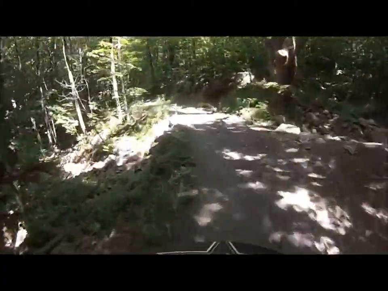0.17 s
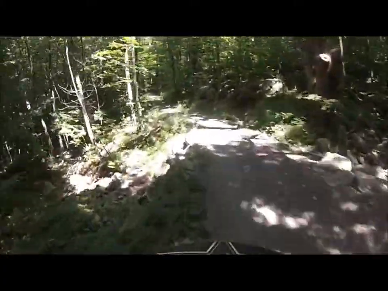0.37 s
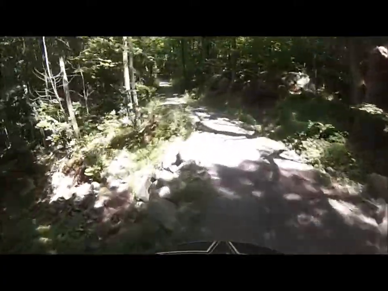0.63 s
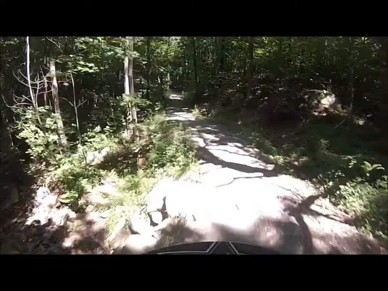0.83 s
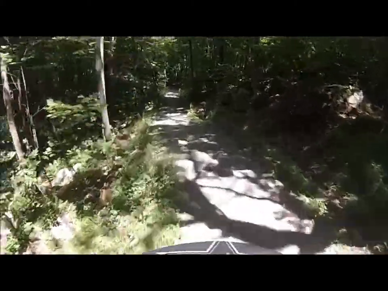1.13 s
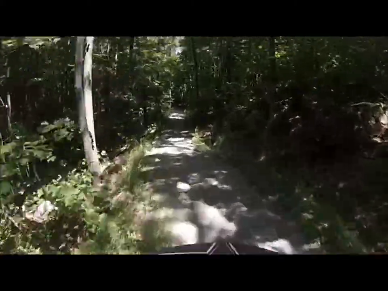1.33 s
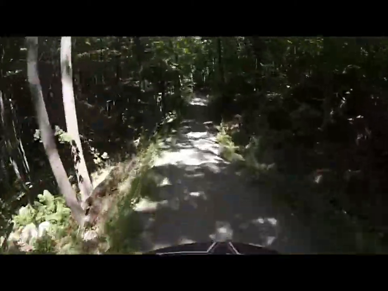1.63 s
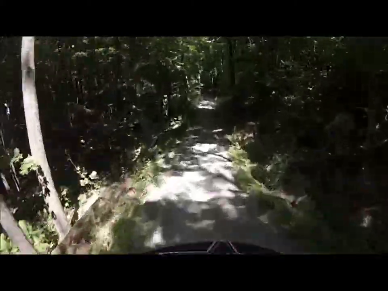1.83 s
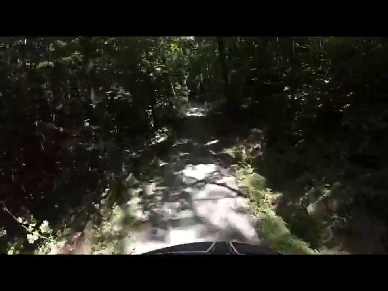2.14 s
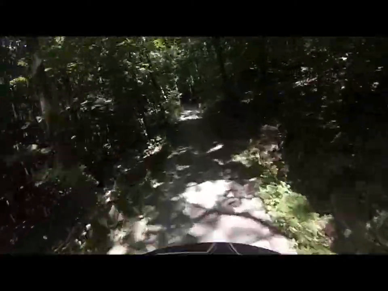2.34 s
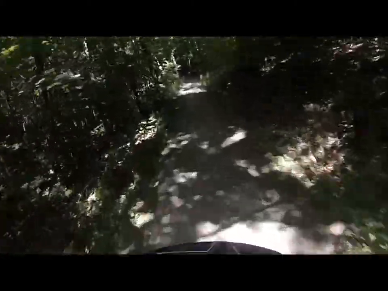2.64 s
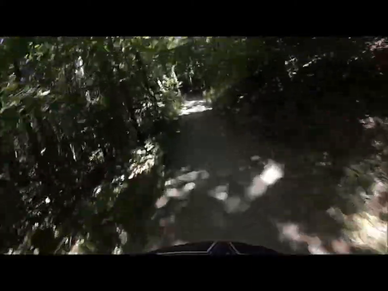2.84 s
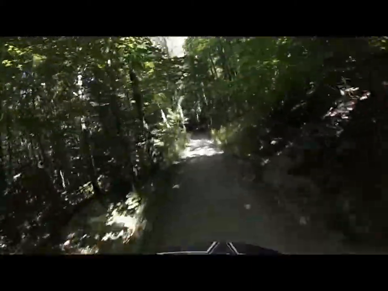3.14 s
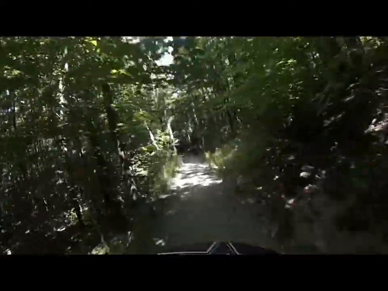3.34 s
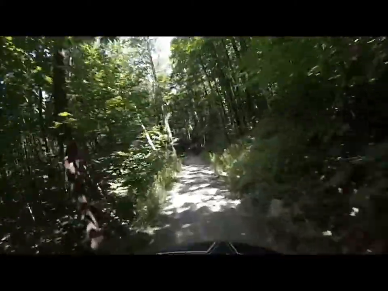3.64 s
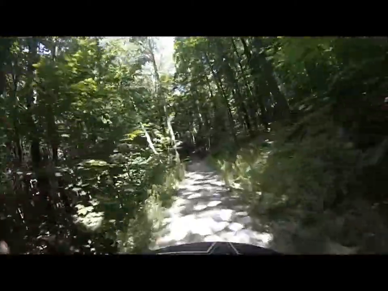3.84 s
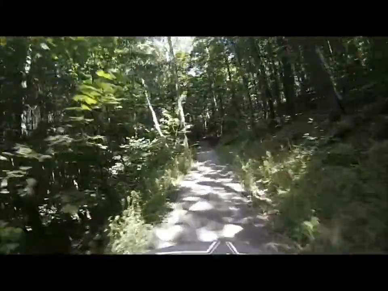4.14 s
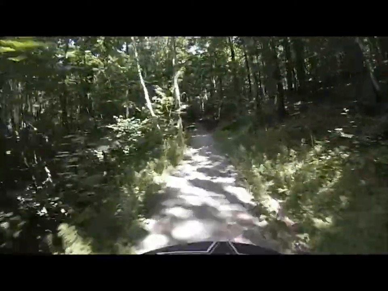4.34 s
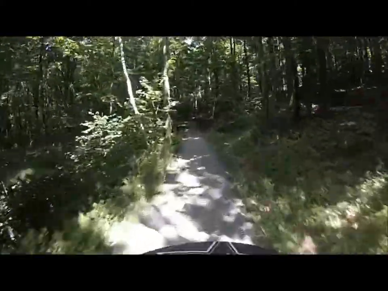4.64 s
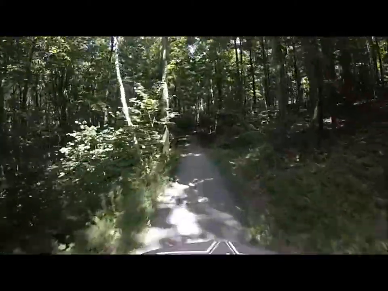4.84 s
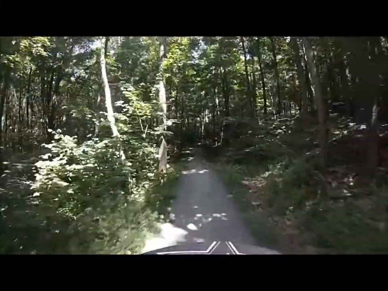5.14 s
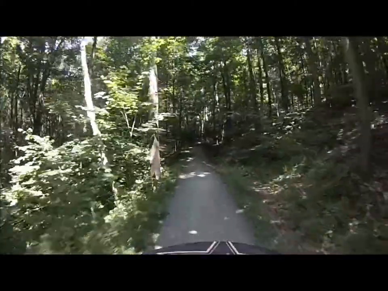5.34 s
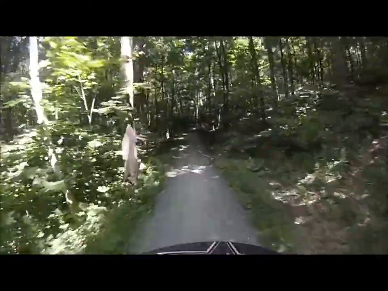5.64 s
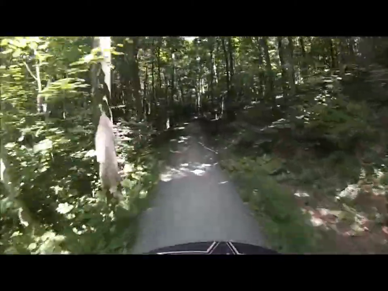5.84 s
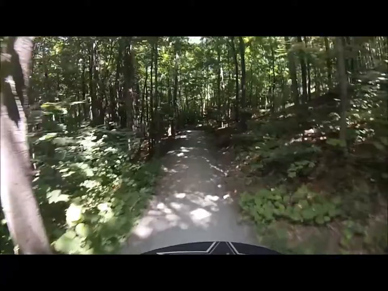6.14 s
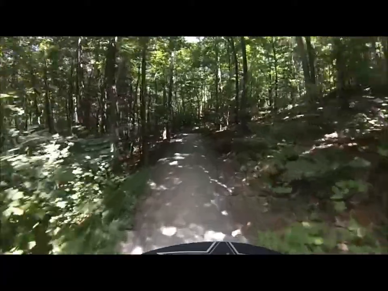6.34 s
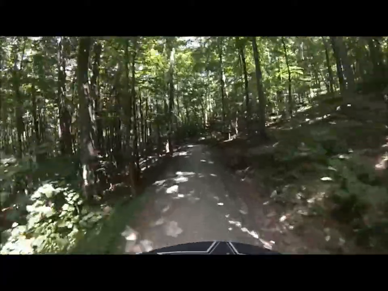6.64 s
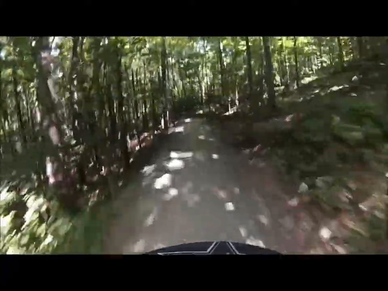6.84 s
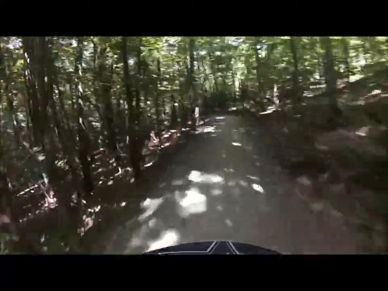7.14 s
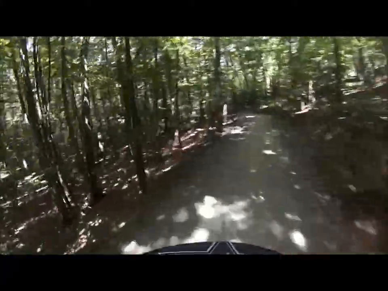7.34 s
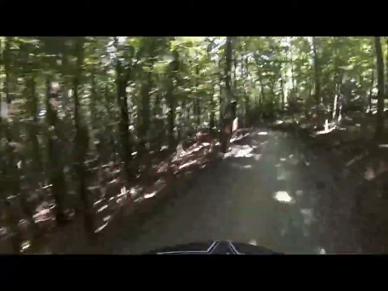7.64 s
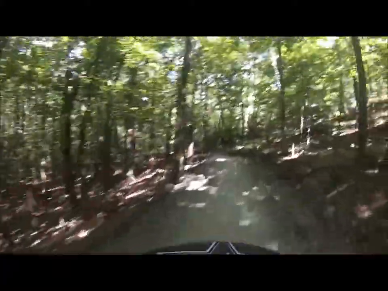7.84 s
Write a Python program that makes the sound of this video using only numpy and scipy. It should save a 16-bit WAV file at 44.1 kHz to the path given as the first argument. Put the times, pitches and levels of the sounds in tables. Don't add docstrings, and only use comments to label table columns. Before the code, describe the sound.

From a camera sealed in a case on a bicycle, gravel hisses in a boxy midrange while low shaking rumbles. Hard plastic knocks and thuds cluster in the first three and a half seconds, then the ride smooths out. A very faint brake ring comes and goes, another knock group hits near seven seconds, and a bird whistles downward. Close, enclosed, almost mono.

```python
import sys
import numpy as np
from scipy import signal
from scipy.fft import rfft, irfft
from scipy.io import wavfile
from scipy.ndimage import uniform_filter1d

SR = 44100
rng = np.random.default_rng(int(sys.argv[2]) if len(sys.argv) > 2 else 0)


def boost(x):
    u = np.asarray(x, float) / 20
    return 10 ** u


def int16_out(signal):
    q = np.round(np.clip(np.atleast_2d(signal).T, -1, 1) * 32767)
    wavfile.write(sys.argv[1], SR, q.astype(np.int16))


N = 352800
T = np.arange(N) / SR


def noise():
    return rng.standard_normal(N)


def evened(x):
    return x / np.sqrt(np.mean(x ** 2) + 1e-20)


def smooth(x, size):
    return uniform_filter1d(uniform_filter1d(x, size), size)


def curve(rows, column):
    rows = np.array(rows)
    return np.interp(T, rows[:, 0], rows[:, column])


def colour(x, points):
    f, level_db = np.transpose(points)
    hz = np.fft.rfftfreq(N, 1 / SR)
    gain = boost(np.interp(np.log(hz + 1), np.log(f), level_db))
    return evened(irfft(rfft(x) * gain, N))


def ring(modes, seconds):
    t = np.arange(round(seconds * SR)) / SR
    return sum((-1) ** k * boost(db) * w * np.exp(-np.pi * w * t) * np.sin(2 * np.pi * hz * t)
               for k, (hz, w, db) in enumerate(modes))


def rung(x, modes, seconds):
    return evened(signal.oaconvolve(x, ring(modes, seconds))[:N])


def flutter(size, depth_db):
    return boost(depth_db * evened(smooth(noise(), size)))


def humps(rows, rise_db_per_s, fall_db_per_s):
    power = 0
    for start, end, db in rows:
        early_s, late_s = np.maximum(start - T, 0), np.maximum(T - end, 0)
        power = power + boost(db - rise_db_per_s * early_s - fall_db_per_s * late_s) ** 2
    return np.sqrt(power)


def add(mix, s, sound):
    part = mix[round(s * SR):][:len(sound)]
    part += sound[:len(part)]


# start in seconds, depth in dB, recovery in seconds.
DUCKS = [(1.431, 5.5, 0.11), (2.416, 12, 0.14), (2.975, 4, 0.07), (3.442, 0.5, 0.18), (6.74, 5.5, 0.077)]


def ducking():
    duck_db = sum(db * (T > s) * np.exp(-((T - s) / max(back_s, .02)) ** 2) for s, db, back_s in DUCKS)
    return boost(-uniform_filter1d(duck_db, size=400))


def crackle():
    clicks_per_s = 2500
    stones = boost(3.3 * np.minimum(rng.exponential(1, N), 5)) * (rng.random(N) < clicks_per_s / SR)
    stones *= rng.choice([-1., 1.], N)
    return noise() + 0.36 * evened(stones)


# time in seconds, hiss in dB.
RIDE = [(0.0, -41), (0.36, -42), (1.05, -41), (1.7, -42.5), (2.1, -40.5), (2.38, -39), (2.58, -36),
        (2.92, -41), (3.32, -39), (4.23, -40), (4.52, -41.5), (5.03, -42), (5.55, -40.5), (5.9, -41.5),
        (6.84, -41), (7.24, -43.5), (7.62, -46.5), (8.0, -44.5)]
# frequency in Hz, width in Hz, level in dB.
CAVITY = [(654, 270, -10.5), (1250, 247, -3.5), (1483, 87.6, 6), (2074, 397, 1), (2290, 314, 1.5),
          (3840, 136, -15.5), (4650, 117, -20)]
# frequency in Hz, density in dB per Hz.
LEAK = [(60, 17.5), (150, 20.5), (300, 10), (500, 4.5), (1000, -31), (2000, -35), (3000, -23.5),
        (4500, -73.5)]
# frequency in Hz, density in dB per Hz.
AIR = [(2000, -38), (2800, 10.5), (3800, -2), (5300, -1), (6200, -9), (8500, -19.5), (10500, -27),
       (15500, -36)]


def gravel():
    usual_db, treble_db, treble_growth, leak_db = -41, -56, 1.22, -5
    boxed = rung(crackle(), CAVITY, .05) + boost(leak_db) * colour(crackle(), LEAK)
    hiss_db = curve(RIDE, column=1)
    air_db = treble_db + treble_growth * (hiss_db - usual_db)
    heard = boost(hiss_db) * boxed + boost(air_db) * colour(crackle(), AIR)
    return heard * flutter(size=400, depth_db=0.77) * ducking()


# frequency in Hz, width in Hz, level in dB.
SWAY = [(24.5, 14.3, -3), (36, 8.5, 1), (50, 58, -15.5)]
# frequency in Hz, width in Hz, level in dB.
BRACKET = [(181.7, 14.7, 1), (124, 38, -11), (70, 45, -13)]
# time in seconds, mount sway in dB, bracket buzz in dB.
TRAIL = [(0.0, -32, -44), (0.2, -31.5, -47.5), (1.0, -28, -46), (1.8, -33, -47), (2.07, -31.5, -43),
         (2.6, -29.5, -39), (3.1, -26.5, -45.5), (3.85, -32.5, -39), (4.3, -37, -44.5), (4.7, -30, -50.5),
         (5.1, -36.5, -41.5), (5.75, -37, -42), (6.0, -33.5, -46.5), (6.3, -38.5, -42),
         (7.15, -36.5, -48.5), (7.55, -39, -40), (8.0, -41, -36.5)]
# start in seconds, sway peak in dB, hold in seconds.
JOLTS = [(0.06, -25, .05), (0.42, -27, .01), (0.52, -28.5, 0.031), (0.71, -29.5, 0.06), (1.1, -17.5, 0.024),
         (1.3, -15.5, 0.023), (1.41, -12.5, 0.027), (1.49, -23.5, 0.024), (1.578, -13, 0.008),
         (1.77, -24.5, 0.021), (2.4, -11.5, 0.017), (2.68, -18, 0.015), (2.87, -15.5, 0.018),
         (2.95, -12.5, 0.025), (3.2, -33, .04), (3.38, -16.5, 0.025), (3.44, -14, .03), (3.7, -25.5, 0.069),
         (4.18, -27, 0.014), (4.3, -26, .01), (4.59, -26, 0.015), (4.75, -31, .04), (5.15, -32, 0.023),
         (5.4, -32, 0.094), (6.62, -23, .03), (6.72, -14.5, .03), (6.91, -16.5, .02), (7.29, -32, 0.018),
         (7.42, -31, 0.018), (7.98, -30.5, .01)]


def shaking():
    sway = rung(noise(), SWAY, .4)
    sway /= (smooth(sway ** 2, size=2500) + .05) ** .45
    held = [(s, s + abs(hold_s), db) for s, db, hold_s in JOLTS]
    jolts = humps(held, rise_db_per_s=260, fall_db_per_s=191.5)
    sway = np.hypot(boost(curve(TRAIL, column=1)), jolts) * evened(sway)
    sway = signal.sosfiltfilt(signal.butter(2, 75, fs=SR, output="sos"), sway)

    buzz = rung(noise() * flutter(size=700, depth_db=3.5), BRACKET, .2)
    buzz /= (smooth(buzz ** 2, size=3000) + .1) ** .3
    return sway + boost(curve(TRAIL, column=2) + 2.5) * evened(buzz)


# frequency in Hz, width in Hz, level in dB.
RAP = [(430, 50, -44), (690, 60, -13), (960, 42, -51.5), (1262, 290, 0.5), (1454, 320, 1.5),
       (2053, 120, 3.5), (2222, 133, 3.5), (3860, 160, -19), (4700, 600, -44)]
# start in seconds, click peak in dB,
# thud peak in dB, thud frequency in Hz, thud t60 in seconds.
KNOCKS = [(0.4922, -15, -18.5, 172, 0.08), (0.629, -16.5, -17, 170, 0.039),
          (1.1011, -11, -18.5, 170.4, 0.083), (1.4268, -20.5, -19, 95, 0.035),
          (1.731, -16, -14.5, 112, 0.044), (2.414, -45, -23, 110, 0.12), (2.533, -45, -30, 150, 0.06),
          (2.6418, -40, -19, 105, 0.1), (2.8264, -33, -23.5, 135, 0.052),
          (2.9508, -23.5, -20.5, 170, 0.067), (3.4148, -19, -18.5, 115, 0.086),
          (4.2842, -23, -18.5, 165, 0.047), (6.7349, -25, -20, 110, 0.14), (6.7685, -30, -28, 175, 0.081),
          (6.9205, -39, -25, 170.5, 0.14), (6.9755, -46, -21, 151, 0.055)]
REBOUNDS = [(0.392, -1.5, -9.5, 118, 0.026), (1.0436, -3, -10, 124, 0.028),
            (1.246, -17.5, -21.5, 181.4, 0.11), (1.3778, -17, -15.5, 133, 0.044),
            (1.6009, -28.5, -18.5, 134, 0.023), (2.3822, -10, -13, 118, 0.055),
            (2.4058, -28, -23, 148.3, 0.12), (2.8951, -18, -20.5, 155, 0.054),
            (3.0437, -42, -29.5, 111, 0.038), (3.2194, -37, -25, 135, 0.05),
            (3.3544, -17.5, -16, 116, 0.11), (6.7052, -12.5, -15, 110.3, 0.084),
            (6.8655, -29, -24, 155, 0.059)]


def knocks(table, stiffen):
    stiffen_s, thud_rise_s, softer_s_per_db = .022, .0008, .00002
    out, t = np.zeros(N), np.arange(SR // 5) / SR
    rap = np.convolve(ring(RAP, .03), np.hanning(9))
    rap *= 1 - np.exp(-np.arange(len(rap)) / (0.00055 * SR))
    rap /= abs(rap).max()
    for s, click_db, thud_db, hz, t60_s in table:
        pitch_hz = hz + stiffen * (BRACKET[0][0] - hz) * (1 - np.exp(-t / stiffen_s))
        rise = 1 - np.exp(-t / (thud_rise_s + softer_s_per_db * abs(click_db)))
        swing = np.sin(2 * np.pi * np.cumsum(pitch_hz) / SR - 1.2)
        thud = swing * boost(-60 * t / max(t60_s, .02)) * rise
        add(out, s - .0004, boost(click_db + 3) * rap)
        add(out, s - .0006, boost(thud_db + 10) * thud)
    return out


# start in seconds, peak in dB.
TICKS = [(1.304, -54), (1.408, -49.5), (1.414, -47), (1.602, -52.5), (2.405, -41.5), (2.429, -45.5),
         (2.951, -47), (2.971, -51.5), (3.0, -49), (3.42, -54), (6.683, -50), (6.704, -45), (6.73, -45),
         (7.119, -50.5), (7.996, -47)]


def grit():
    out = np.zeros(N)
    band = signal.butter(1, [2500, 7000], "band", fs=SR)
    bursts = signal.lfilter(*band, rng.standard_normal((len(TICKS), 200))) * np.hanning(200)
    for (s, db), burst in zip(TICKS, bursts):
        add(out, s, boost(db + 9) * signal.lfilter([.3], [1, -.7], burst))
    return out


# frequency in Hz, width in Hz, level in dB.
BRAKE = [(7830, 70, -83)]
# frequency in Hz, width in Hz, level in dB.
BRAKE_HIGH = [(9400, 120, -88), (10960, 70, -87), (10680, 70, -90)]
# start in seconds, end in seconds, level in dB.
BRAKE_ON = [
    (3.59, 3.615, -2),
    (5.22, 5.82, 0),
    (6.78, 7.17, 0),
]
# start in seconds, end in seconds, level in dB.
BRAKE_FIRM = [
    (3.575, 3.62, 7),
    (5.22, 5.78, 0),
    (5.79, 5.835, 6),
]


def brake():
    out = np.zeros(N)
    for modes, pulls in ((BRAKE, BRAKE_ON), (BRAKE_HIGH, BRAKE_FIRM)):
        song = sum(boost(db) * rung(noise(), [(hz, w, 0)], .05) for hz, w, db in modes)
        out += humps(pulls, rise_db_per_s=1500, fall_db_per_s=1500) * song
    return out


# time in seconds, pitch in Hz, level in dB.
CHIRP = [(7.205, 3480, -70), (7.225, 3300, -57), (7.245, 2750, -49), (7.28, 2380, -47), (7.33, 2050, -48),
         (7.42, 1850, -47), (7.55, 1750, -47), (7.65, 1520, -47), (7.78, 1500, -70)]


def bird():
    start_s, end_s = CHIRP[0][0], CHIRP[-1][0]
    turn = np.exp(2j * np.pi * np.cumsum(curve(CHIRP, column=1)) / SR)
    blur = signal.lfilter(*signal.butter(2, 130, fs=SR), rng.standard_normal((2, N)))
    hoarse = np.clip((T - start_s) / .2, .35, .9)
    voice = (1 - hoarse) + hoarse * (evened(blur[0]) + 1j * evened(blur[1])) / np.sqrt(2)
    return (T > start_s) * (T < end_s) * boost(curve(CHIRP, column=2)) * (voice * turn).real


# frequency in Hz, density in dB per Hz.
UNLIKE = [(4500, -46.5), (5300, -8.5), (6000, 1.5), (8500, -4), (10000, -6), (11500, -19), (14500, -31)]
# start in seconds, end in seconds.
LIMITING = [(0.391, .48), (1.043, 1.17), (1.29, 1.61), (1.728, 1.75), (2.382, 2.62), (2.619, 2.62),
            (2.881, 3.08), (3.34, 3.48), (6.684, 6.84)]
# frequency in Hz, density in dB per Hz.
GRAINY = [(30, 4), (150, -15), (500, -26), (1500, -32.5), (3000, -38.5), (6000, -46.5), (10000, -56.5),
          (14500, -70)]


def difference(mid):
    loud = sum((T > start) & (T < end) for start, end in LIMITING)
    level = np.sqrt(abs(uniform_filter1d(mid ** 2, size=1500)))
    treble = signal.filtfilt(*signal.butter(2, 4500, "high", fs=SR), mid)
    side = boost(-81.5) * colour(noise(), UNLIKE)
    side += boost(-24.5) * loud * level * colour(noise(), GRAINY)
    side += boost(-17) * loud * treble
    return side


def scene():
    mid = gravel() + shaking()
    mid += knocks(KNOCKS, stiffen=.9) - knocks(REBOUNDS, stiffen=.1)
    mid += grit() + brake() + bird()
    side = difference(mid)
    return np.array([mid + side, mid - side])


def low_pass(x):
    return signal.sosfilt(signal.butter(12, 15010, fs=SR, output="sos"), x)


# frequency in Hz, density in dB per Hz.
SELF_NOISE = [(3000, -28.5), (6000, -1), (10000, -6.5), (13000, -10), (15500, -12)]


def record(dry):
    wired = dry + boost(-75) * colour(noise(), SELF_NOISE) * ducking()
    knee = 12
    bent = wired / (1 + abs(wired) ** knee) ** (1 / knee)
    return low_pass(bent)


dry = scene()
out = record(dry)
int16_out(out)
```